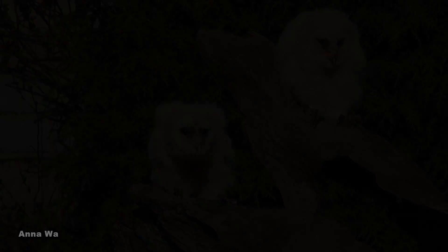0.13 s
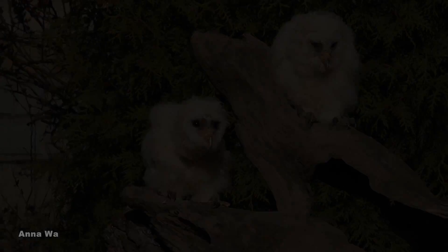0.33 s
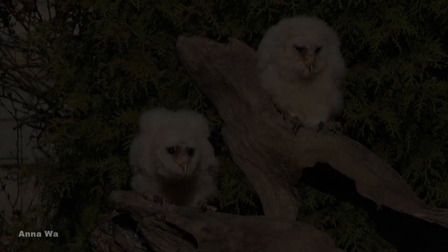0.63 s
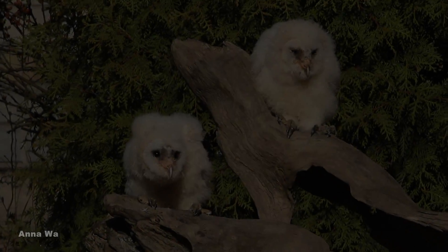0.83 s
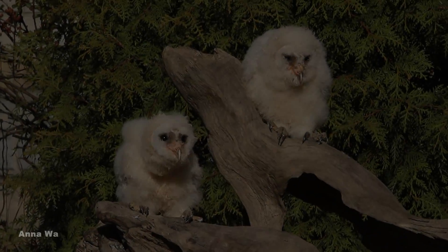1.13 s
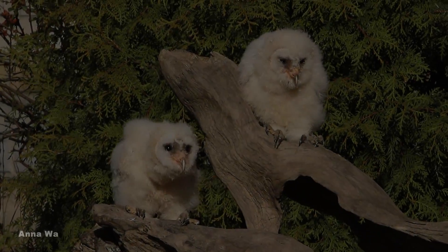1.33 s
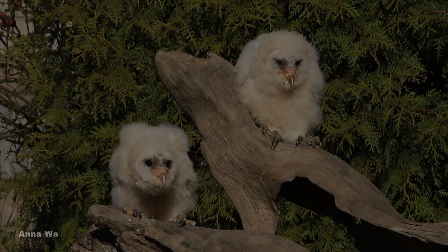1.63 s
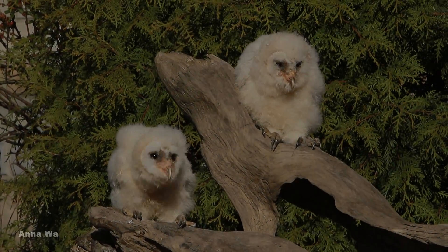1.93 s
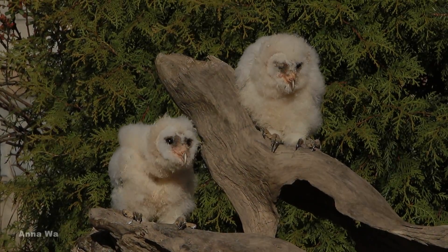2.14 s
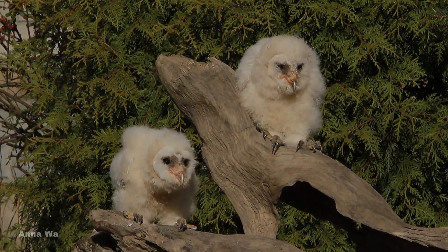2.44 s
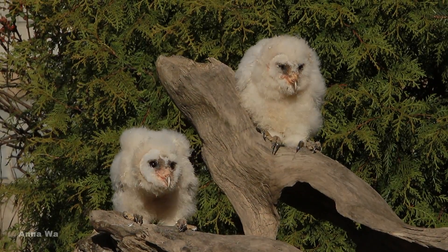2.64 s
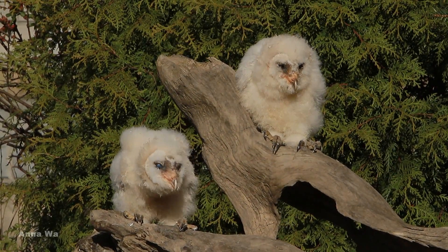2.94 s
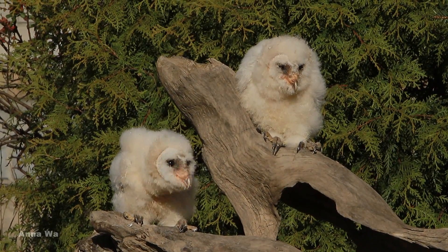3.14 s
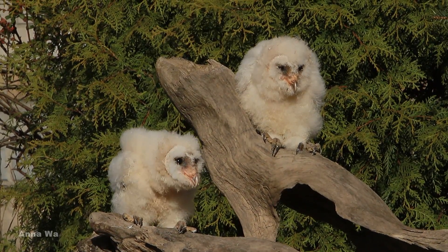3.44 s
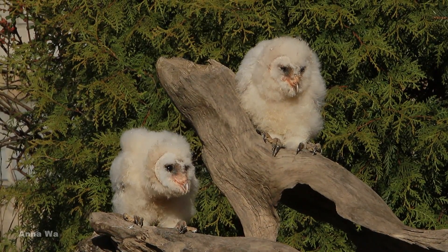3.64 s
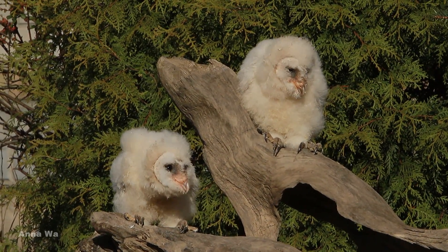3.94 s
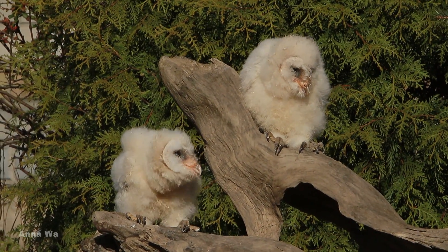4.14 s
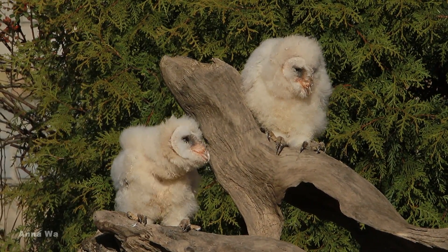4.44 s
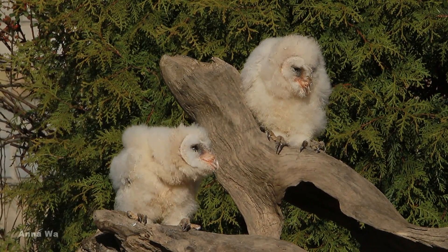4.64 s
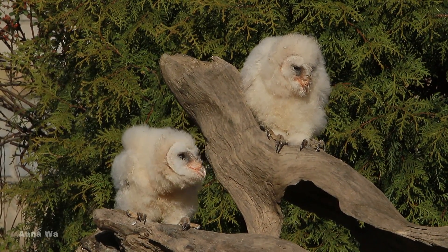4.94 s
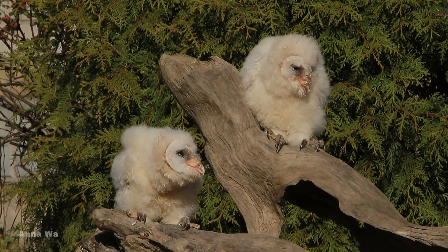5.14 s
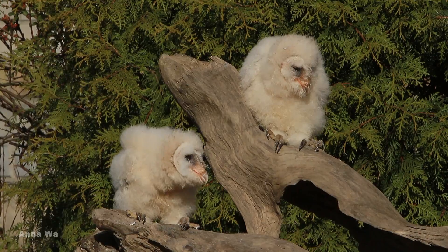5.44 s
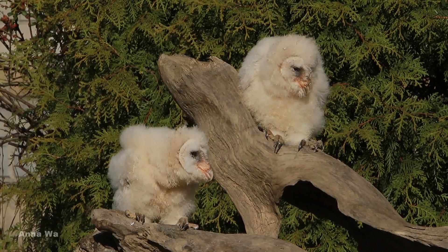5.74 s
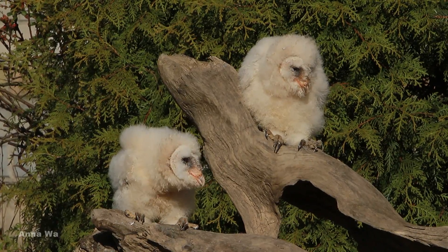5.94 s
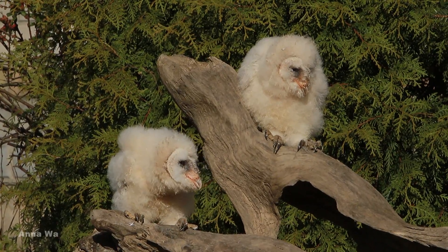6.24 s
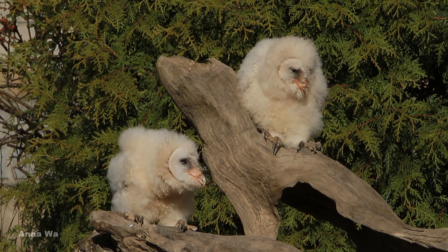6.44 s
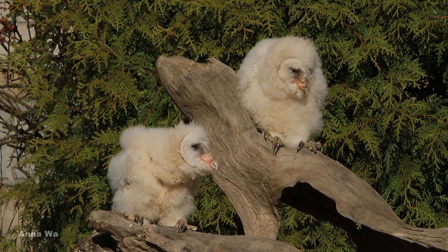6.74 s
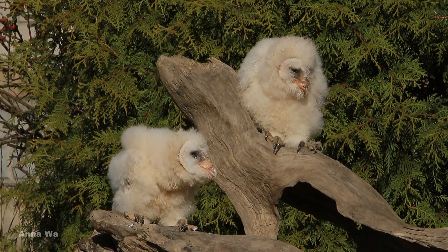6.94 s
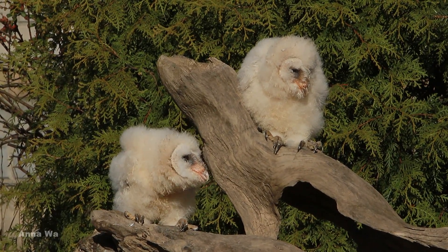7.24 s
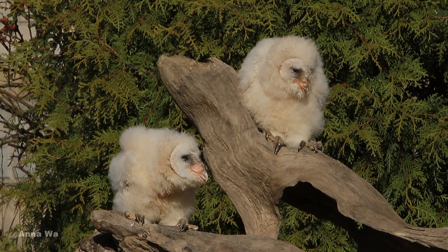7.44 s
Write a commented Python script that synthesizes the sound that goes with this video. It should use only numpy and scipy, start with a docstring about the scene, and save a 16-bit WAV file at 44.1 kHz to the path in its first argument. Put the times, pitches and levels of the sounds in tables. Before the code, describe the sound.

Five begging screeches from young owls, each a scratchy rattle near two kilohertz pulsing about twenty times a second into arched chirps. The first pair is faint and joined; later calls grow louder and harsher with short gaps. A toneless hiss swells before the fourth. Tiny squeaks mark starts and ends, claws tick on wood, and low outdoor air continues, with a thin scattered tail, heard centrally.

```python
"""Begging barn owl chicks

Owl chicks beg on a branch in a quiet garden: five rasping screeches, the first two back to back.
The voice organ (syrinx) rattles chaotically near 2.2 kHz; about twenty times a second its tension
surges and locks the rattle into a cleaner, arched chirp. Squeaks sit at most starts and ends of screeches,
and a plain hiss swells ahead of the fourth. Claws tap the wood, foliage and walls throw a little
sound back, and a soft rush of outdoor air runs throughout."""
import sys
import numpy as np
from scipy import signal
from scipy.fft import rfft, irfft, next_fast_len
from scipy.io import wavfile
from scipy.ndimage import uniform_filter1d

SR = 44100
rng = np.random.default_rng(int(sys.argv[2]) if len(sys.argv) > 2 else 0)


def dump(signal):
    """Clip the signal to [-1, 1] and save it as 16-bit WAV at the path in sys.argv[1]."""
    limited = np.clip(np.atleast_2d(signal).T, -1, 1)
    pcm = np.round(limited * 32767).astype(np.int16)
    wavfile.write(sys.argv[1], SR, pcm)


N = 334719
TIME = np.arange(N) / SR


def from_db(db):
    """Turn decibels into a gain."""
    return 10 ** (np.asarray(db) / 20)


def blend(a, b, share):
    """Move from a to b as the share goes from 0 to 1."""
    return a + (b - a) * share


def rms_one(x):
    """Scale to an average strength (rms) of 1."""
    return x / np.sqrt(np.mean(x ** 2) + 1e-20)


def curves(rows, t):
    """Read every column of a table at the times t, with straight lines between its rows."""
    s, *columns = np.transpose(rows)
    return [np.interp(t, s, column) for column in columns]


def colour(x, points):
    """Make some pitches stronger than others, following (frequency [Hz], level [dB]) points."""
    hz, db = np.transpose(points)
    size = next_fast_len(len(x) + 2048)
    bins_hz = np.maximum(np.fft.rfftfreq(size, 1 / SR), 1)
    gain = from_db(np.interp(np.log(bins_hz), np.log(hz), db))
    return irfft(rfft(x, size) * gain, size)[:len(x)]


def band(x, centre_hz, ratio, order=2):
    """Keep a broad band that reaches a ratio below and above its centre."""
    ratio = max(ratio, 1.05)
    edges_hz = [centre_hz / ratio, min(centre_hz * ratio, .45 * SR)]
    return signal.sosfilt(signal.butter(order, edges_hz, "band", fs=SR, output="sos"), x)


def wander(t, per_s):
    """Drift between random values, per_s of them a second, with an rms of 1."""
    steps = (t - t[0]) * per_s
    return rms_one(np.interp(steps, np.arange(len(t)), rng.standard_normal(len(t))))


def gate(t, edge_s):
    """Open smoothly at the start of t and close at its end."""
    to_edge_s = np.minimum(t - t[0], t[-1] - t)
    return np.sin(np.pi / 2 * np.clip(to_edge_s / edge_s, 0, 1)) ** 2


# loudness of the garden air: (time [s], level [dB])
AIR_LEVEL = [(0, -61.5), (1, -65.3), (2.2, -66.3), (3.8, -62), (6.1, -61), (7.59, -57.5)]
# tone of the garden air: (frequency [Hz], relative level [dB])
AIR_TONE = [(25, -16), (60, -7.5), (130, -1.5), (230, -2.5), (320, 0), (550, -6), (1000, -9), (2000, -13),
            (3500, -16), (5000, -22.5), (8000, -26.5), (15500, -36)]


def air():
    """Soft outdoor rush: random noise, shaped in tone and slowly changing in loudness."""
    rush = rms_one(colour(rng.standard_normal(N), AIR_TONE))
    return from_db(curves(AIR_LEVEL, TIME)[0]) * rush


def syrinx(t, pitch_hz, rough, overtone_db, fundamental_db=0, jitter=.075, shimmer_db=12.0):
    """The voice organ lets out one puff a cycle; roughness scatters puffs in timing and strength."""
    cycles = np.cumsum(pitch_hz * (1 + jitter * rough * wander(t, 1900))) / SR
    puffs = from_db(fundamental_db) * np.cos(2 * np.pi * cycles)
    for k in range(2, 9):
        low_enough = k * pitch_hz < .42 * SR
        puffs = puffs + from_db(overtone_db * (k - 1)) * low_enough * np.cos(2 * np.pi * k * cycles)
    chance = rng.uniform(-1, 1, len(t))[np.round(cycles).astype(int)]    # one draw per puff
    return puffs * from_db(shimmer_db * rough * (chance - 0.55))


TRILL_STOP_S = .04    # no surge peaks in this last stretch of a screech


def trill(t, first_s, per_s, drift_per_s, half_width_s, slow_fall, lock_before, lock_after=1.87):
    """Tension surges: how far they lift the pitch, how firmly they lock it, which one is nearest."""
    turns = per_s * (t - first_s) + drift_per_s * (t - first_s) ** 2 / 2
    last_turn = np.interp(t[-1] - TRILL_STOP_S, t, turns)
    crests_s = np.interp(np.arange(last_turn), turns, t)
    nearest = np.clip(np.round(turns), 0, len(crests_s) - 1).astype(int)
    since = (t - crests_s[:, None]) / half_width_s    # time from each crest, in half widths
    rising = since < 0
    lift = np.exp(-.5 * np.where(rising, since, since / slow_fall) ** 2).max(axis=0)
    # the lock takes hold abruptly and lingers as the pitch falls
    distance = np.where(rising, (since / lock_before) ** 4, np.abs(since / lock_after) ** 3)
    lock = np.exp(-.5 * distance).max(axis=0)
    return lift, lock, nearest


# no two surges are quite alike
SURGE_PITCH_SPREAD, SURGE_SPREAD_DB = .025, 0.82    # share of the pitch; dB
# roughness 0-1 of the open rattle and of the cleared voice
RATTLE_ROUGH, CLEAR_ROUGH = .97, .47
# share of that roughness left when fully locked: firm chirp, feeble chirp
CREST_SHARE, FEEBLE_SHARE = .145, .35
FEEBLE_LIFT_HZ = 250    # the smaller the pitch lift beside this, the poorer the lock
TROUGH_SHARE = .88    # between surges the pitch drops to this share of the top pitch, or lower
HANG_ABOVE_HZ, HANG_PER_HZ = 2950, .003    # surges reaching above this pitch fall more slowly
THIN_AT_S, THIN_OVER_S = 1.568, 0.24    # the second screech strains: its fundamental fades
# late in the last screech the surges broaden, then the voice clears into a soft, whistled warble
WIDEN_AT_S, WIDEN_OVER_S, CLEAR_WIDENING = 6.88, .24, 2.2    # the last is times longer
CLEAR_AT_S, CLEAR_OVER_S = 7.11, .07
CLEAR_OVERTONE_DB, CLEAR_CHIRP_DB = -1.5, -1.5    # change per overtone; change of the chirps
THROAT_EDGE_DB, THROAT_EDGE_S = 5.5, 0.1    # low throat sound is stronger near both ends
# each screech's trill is a clock that may drift, one row per screech:
# (time of first surge [s], surges per second [1/s], change of that rate [1/s per s])
TRILL_CLOCKS = [(.003, 19.57, 0), (.812, 19.15, 1.06), (2.831, 21.03, -3.15), (4.281, 21.3, -1.62),
                (6.209, 20.13, .4)]


def screech(number, effort, throat, rest_hz, half_width_s, lock_before, chirp_db, low_db,
            overtone_db, pure_db, fundamental_db, thin_db=0, air_db=-0.5):
    """A rattle that locks into a chirp on every surge, coloured by the throat."""
    inside = (TIME >= effort[0][0]) & (TIME <= effort[-1][0])
    t, out = TIME[inside], np.zeros(N)
    force_db, top_hz = curves(effort, t)
    clear = np.clip((t - CLEAR_AT_S) / CLEAR_OVER_S, 0, 1)
    widen = np.clip((t - WIDEN_AT_S) / WIDEN_OVER_S, 0, 1)
    thin = np.clip((t - THIN_AT_S) / THIN_OVER_S, 0, 1)

    width_s = half_width_s * blend(1, CLEAR_WIDENING, widen)
    slow_fall = 1 + HANG_PER_HZ * np.maximum(top_hz - HANG_ABOVE_HZ, 0)
    lift, lock, nearest = trill(t, *TRILL_CLOCKS[number - 1], width_s, slow_fall, lock_before)
    vigour = rng.standard_normal(nearest[-1] + 1)[nearest]    # a stronger surge is higher and louder

    trough_hz = np.minimum(rest_hz, TROUGH_SHARE * top_hz)
    crest_hz = top_hz * (1 + SURGE_PITCH_SPREAD * vigour)
    pitch_hz = blend(trough_hz, crest_hz, lift) * (1 + .015 * wander(t, 70))

    feeble = np.exp(-np.maximum(top_hz - rest_hz, 0) / FEEBLE_LIFT_HZ) * (1 - clear)
    locked_share = blend(CREST_SHARE, FEEBLE_SHARE, feeble)
    rough = blend(RATTLE_ROUGH, CLEAR_ROUGH, clear) * blend(locked_share, 1, (1 - lock) ** 1.7)

    # level step per overtone: locking changes it by pure_db
    slope_db = overtone_db + blend(pure_db * lock, CLEAR_OVERTONE_DB, clear)
    puffs = syrinx(t, pitch_hz, rough, slope_db, fundamental_db + thin_db * thin)
    breath = from_db(air_db) * rough * rng.standard_normal(len(t))
    voice = colour(rms_one(puffs) + breath, throat)
    # even out the loudness over 20 ms, then set it by effort and chirps
    voice = voice / np.sqrt(uniform_filter1d(voice ** 2, size=900) + 1e-12)
    chirp_gain_db = chirp_db + CLEAR_CHIRP_DB * clear + SURGE_SPREAD_DB * vigour
    voice = voice * from_db(force_db + lock * chirp_gain_db)

    # noise for the low resonance of the throat, heard mostly between chirps
    edge = np.exp(-np.minimum(t - t[0], t[-1] - t) / THROAT_EDGE_S)
    low = rms_one(band(rng.standard_normal(len(t)), 890, 1.25) * (1 - 0.86 * lock))
    low = low * from_db(low_db + THROAT_EDGE_DB * edge)
    out[inside] = (voice + low * (1 - clear)) * gate(t, 0.0023)
    return out


# throat and beak tone, also used by the second screech: (frequency [Hz], relative level [dB])
SOFT_TONE = [(1000, -58), (1700, -31), (2120, -16.5), (2600, -0.5), (2910, -4), (3160, -5.5), (3500, -16.5),
             (5710, -1.5), (6440, 0.5), (8040, -8.5), (8740, 1.5), (9580, -6), (11200, -4.5), (13000, -24),
             (15500, -22)]
# effort: (time [s], level of the rattle [dB], top pitch of the surges [Hz])
FIRST_EFFORT = [(0, -53, 2940), (.1, -50.5, 2950), (.3, -56.5, 2797), (.41, -58.5, 2540), (.5, -53.5, 3016),
                (.66, -58.5, 2460), (.765, -82, 2400)]


def first_screech():
    """A soft throat with brief surges of tension."""
    return screech(1, FIRST_EFFORT, SOFT_TONE, rest_hz=2285, half_width_s=.0052, lock_before=1.07,
                   chirp_db=8.6, low_db=-73.5, overtone_db=-0.4, pure_db=-1.15, fundamental_db=-2.5)


# claws and feet: (time [s], starting level [dB], centre frequency [Hz], time to fall 60 dB [s])
WOOD_TAPS = [(.068, -45.5, 1080, 0.066), (.076, -43.5, 2410, .03), (.085, -47, 950, 0.026),
             (0.079, -49, 193, 0.15), (.222, -42, 1770, 0.032), (.248, -45.5, 1690, .03),
             (3.51, -47, 1200, 0.063), (5.645, -55, 400, 0.31), (5.665, -50.5, 130, 0.3)]


def taps():
    """Dull, quickly damped contacts with dead wood: bands of noise that die away."""
    out, t = np.zeros(N), np.arange(SR // 2) / SR
    for s, db, centre_hz, t60_s in WOOD_TAPS:
        knock = rms_one(band(rng.standard_normal(len(t)), centre_hz, 1.57))
        start = int(s * SR)
        out[start:start + len(t)] += knock * from_db(db - 60 * t / t60_s)
    return out


# squeaks as the syrinx tightens or lets go: (time [s], length [s], first pitch [Hz],
# last pitch [Hz], level [dB], step per overtone [dB], roughness [0-1])
SQUEAK_GLIDES = [(0.764, 0.014, 2690, 2380, -54, -1, .95), (1.693, 0.052, 3700, 5200, -61, -4, 0.42),
                 (1.778, 0.015, 5900, 3300, -55, -7, .2), (1.797, 0.023, 3700, 5300, -61, -2, .3),
                 (1.831, .02, 5250, 3700, -56, -5, 0.54), (1.856, .022, 3700, 4900, -61, -1, .3),
                 (1.934, 0.019, 4180, 2890, -48, -10, 0.35), (2.499, 0.038, 3660, 3990, -51, -8.5, 0.25),
                 (2.525, 0.024, 4370, 6440, -54, -16, 0.9), (2.593, 0.015, 4140, 4010, -49, -6.5, 0.4),
                 (3.421, 0.013, 2880, 4570, -44, -5.5, 0), (3.44, .012, 3900, 2500, -45, -7, .3),
                 (3.514, 0.038, 3980, 2930, -42.5, -10, 0.35), (3.87, 0.0089, 6290, 4350, -48.5, -21, 0.4),
                 (5.666, 0.025, 3690, 3030, -38.5, -13, 0.32), (6.153, 0.022, 3020, 4340, -39.5, -21, 0.33),
                 (7.437, 0.026, 4050, 2790, -40, -9, 0.29)]


def squeaks():
    """Short pitch glides of the syrinx, with more noise the rougher they are."""
    out = np.zeros(N)
    for s, length_s, first_hz, last_hz, db, overtone_db, rough in SQUEAK_GLIDES:
        t = np.arange(int(length_s * SR)) / SR
        tone = syrinx(t, np.geomspace(first_hz, last_hz, len(t)), rough, overtone_db)
        tone = tone + rough * band(rng.standard_normal(len(t)), 5700, 1.32)
        start = int(s * SR)
        out[start:start + len(t)] += from_db(db) * rms_one(tone * gate(t, length_s / 3))
    return out


# effort: (time [s], level of the rattle [dB], top pitch of the surges [Hz])
SECOND_EFFORT = [(.765, -57.5, 2700), (.98, -64, 2480), (1.11, -60, 2617), (1.19, -55, 3003),
                 (1.33, -58.5, 2648), (1.48, -57, 2856), (1.66, -56.5, 2906), (1.78, -50, 2997),
                 (1.94, -56, 2544)]


def second_screech():
    """The same soft throat; its fundamental fades as the voice strains."""
    return screech(2, SECOND_EFFORT, SOFT_TONE, rest_hz=2215, half_width_s=.0057, lock_before=1.0,
                   chirp_db=9.0, low_db=-79, overtone_db=0.0, pure_db=0.25, fundamental_db=1.5,
                   thin_db=-15.5)


# throat and beak tone: (frequency [Hz], relative level [dB])
FIRM_TONE = [(1000, -29), (1700, -12.5), (2050, -19), (2460, -8), (2780, -5), (3660, -9), (4050, -11),
             (5160, -12.5), (5500, -7.5), (6440, -7), (8660, -11.5), (10000, -15), (11000, -10.5),
             (13000, -28), (15500, -31)]
# effort: (time [s], level of the rattle [dB], top pitch of the surges [Hz])
THIRD_EFFORT = [(2.645, -54.5, 2400), (2.72, -52.5, 2405), (2.82, -57.5, 2416), (2.93, -49, 2800),
                (3.27, -49.5, 2838), (3.38, -46.5, 3040), (3.53, -47.5, 2577)]


def third_screech():
    """A firmer throat whose locked chirps lose much of their overtones."""
    return screech(3, THIRD_EFFORT, FIRM_TONE, rest_hz=2225, half_width_s=.0058, lock_before=1.49,
                   chirp_db=8.0, low_db=-62.0, overtone_db=-0.54, pure_db=-2.0, fundamental_db=-.5)


# starts abruptly, swells towards its full level, then fades
HISS_START_S, HISS_RELEASE_S, HISS_DB = 3.869, 4.207, -34.5
HISS_SWELL_DB, HISS_SWELL_S, HISS_FADE_DB_PER_S = 17.5, 0.098, 66.0
# tone of the hiss: (frequency [Hz], relative level [dB])
HISS_TONE = [(150, -50), (250, -15), (434, -13), (635, -7.5), (852, -7), (978, -14), (1410, -4.5),
             (1590, -8), (2400, -3), (3890, -4), (4240, -2), (6210, -4), (9890, -5), (15500, -21.5)]


def hiss(flutter_db=1.0, attack_s=0.0088):
    """Air forced through the open beak: fluttering noise that dies under the fourth screech."""
    rush = rng.standard_normal(N) * from_db(flutter_db * wander(TIME, 500))
    age_s = np.maximum(TIME - HISS_START_S, 0)
    swell_db = HISS_SWELL_DB * np.exp(-age_s / HISS_SWELL_S)
    fade_db = HISS_FADE_DB_PER_S * np.maximum(TIME - HISS_RELEASE_S, 0)
    level = from_db(HISS_DB - swell_db - fade_db)
    return rms_one(colour(rush, HISS_TONE)) * level * np.minimum(age_s / attack_s, 1)


# throat and beak tone: (frequency [Hz], relative level [dB])
LOUD_TONE = [(1000, -45), (1700, -17), (2420, -9.5), (2930, -8), (3280, -5), (3600, -6.5), (4290, -13.5),
             (4660, -6), (5250, -10.5), (6560, -0.5), (7750, -4.5), (8900, -5), (11300, -6.5), (12800, -22),
             (15500, -27)]
# effort: (time [s], level of the rattle [dB], top pitch of the surges [Hz])
FOURTH_EFFORT = [(4.24, -44, 3650), (4.33, -41.5, 3400), (4.55, -37.5, 3300), (4.72, -41, 3140),
                 (4.87, -40, 3050), (4.96, -40.5, 2622), (5.52, -40, 2540), (5.62, -43.5, 2430),
                 (5.675, -38.5, 2407)]


def fourth_screech():
    """A strong voice whose first surges reach very high."""
    return screech(4, FOURTH_EFFORT, LOUD_TONE, rest_hz=2196, half_width_s=.0039, lock_before=1.71,
                   chirp_db=8.5, low_db=-58.5, overtone_db=0.16, pure_db=-0.77, fundamental_db=-4.0)


# throat and beak tone: (frequency [Hz], relative level [dB])
WIDE_TONE = [(1000, -30), (1700, -11), (1860, -11.5), (2200, -7.5), (2550, -4), (2850, -3.5), (3190, -4),
             (3700, -5.5), (4290, -5.5), (4830, -2), (6320, -5.5), (7190, -3), (8820, -1.5), (11500, -10.5),
             (15500, -28.5)]
# effort: (time [s], level of the rattle [dB], top pitch of the surges [Hz])
FIFTH_EFFORT = [(6.162, -44, 2200), (6.28, -45.5, 2120), (6.4, -38.5, 3000), (6.56, -39, 2780),
                (6.7, -37.5, 2994), (6.92, -40, 2600), (7.09, -48, 2570), (7.22, -45.5, 2713),
                (7.445, -48, 2165)]


def fifth_screech():
    """A wide, bright throat; the rattle clears into a warble near the end."""
    return screech(5, FIFTH_EFFORT, WIDE_TONE, rest_hz=2200, half_width_s=.0042, lock_before=1.43,
                   chirp_db=9.5, low_db=-55.0, overtone_db=0.37, pure_db=-0.7, fundamental_db=-4.0)


GARDEN_T60_S, GARDEN_DB = 0.52, -11.5    # time to fall 60 dB; gain of the tail


def garden(x, onset_s=0.0036):
    """Foliage and walls scatter a thin, dying tail, duller at the top."""
    t = np.arange(SR) / SR
    tail = rng.standard_normal(SR) * from_db(-60 * t / GARDEN_T60_S) * (1 - np.exp(-t / onset_s))
    tail = colour(tail / np.linalg.norm(tail), [(500, 2.5), (3500, 1.5), (7000, -1), (14000, -6.0)])
    return from_db(GARDEN_DB) * signal.fftconvolve(x, tail)[:N]


def scene():
    """Add the owls, their small noises, the garden tail and the air, alike in both channels."""
    owls = first_screech() + second_screech() + third_screech() + fourth_screech() + fifth_screech()
    near = owls + taps() + squeaks() + hiss()
    return np.tile(near + garden(near) + air(), (2, 1))


CUTOFF_HZ = 15900


def record(dry):
    """Cut the very top steeply with a low-pass filter."""
    return signal.sosfilt(signal.ellip(12, .1, 80, CUTOFF_HZ, fs=SR, output="sos"), dry)


dry = scene()
out = record(dry)
dump(out)
```